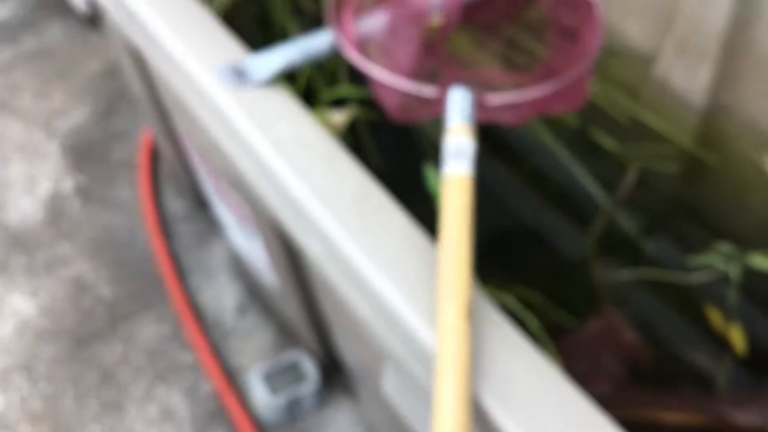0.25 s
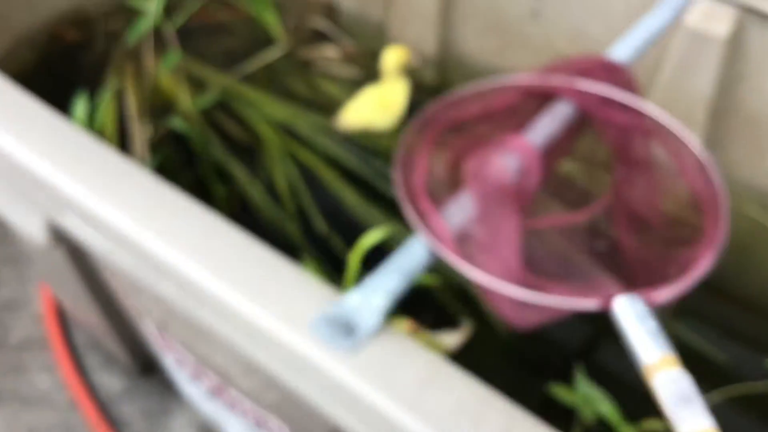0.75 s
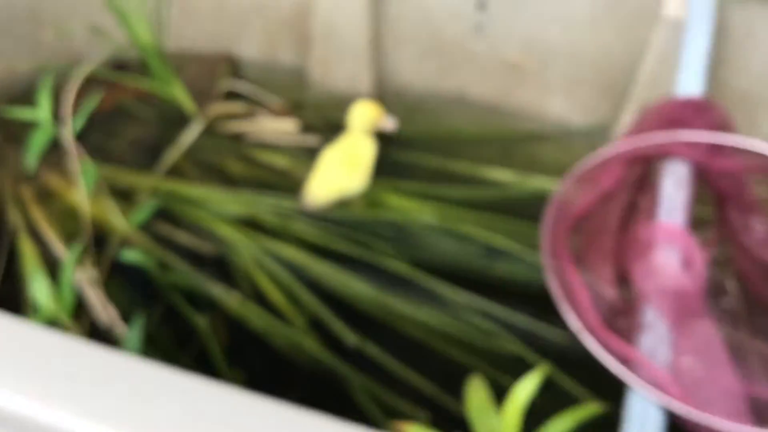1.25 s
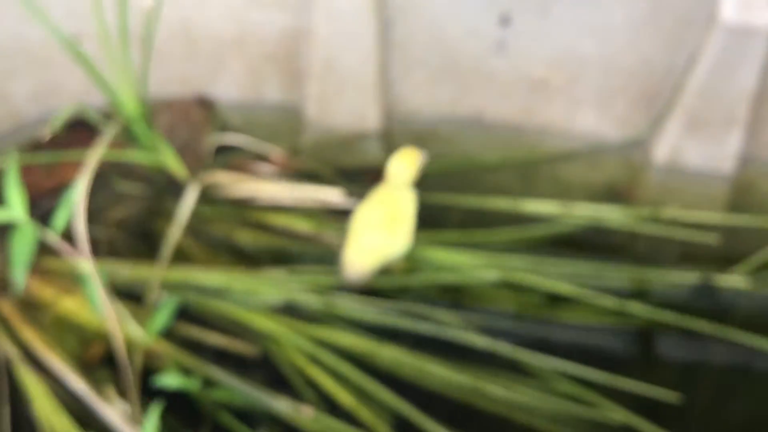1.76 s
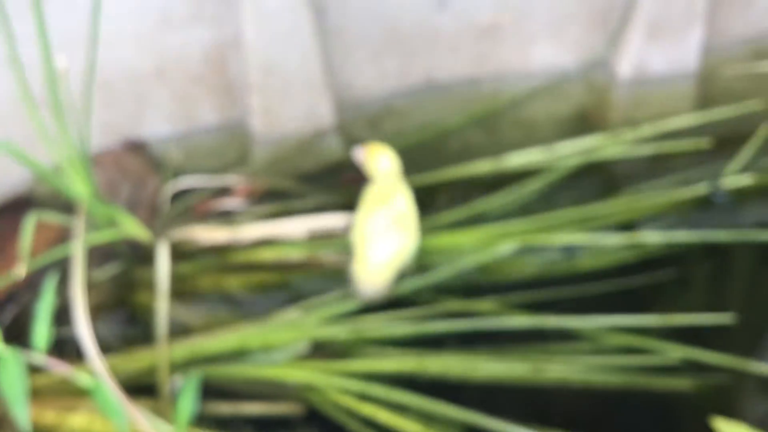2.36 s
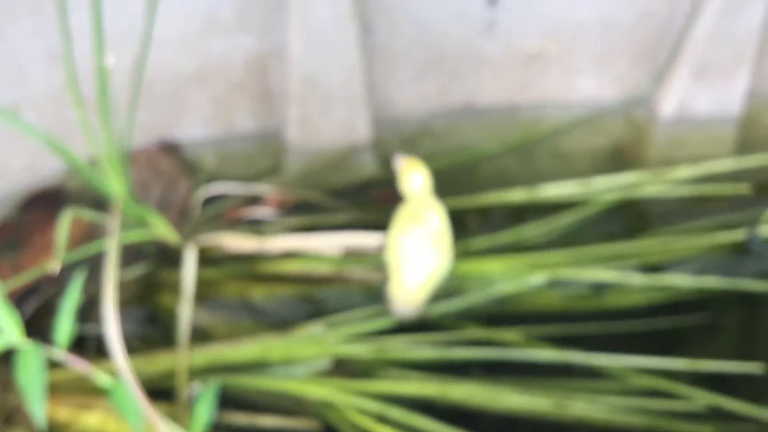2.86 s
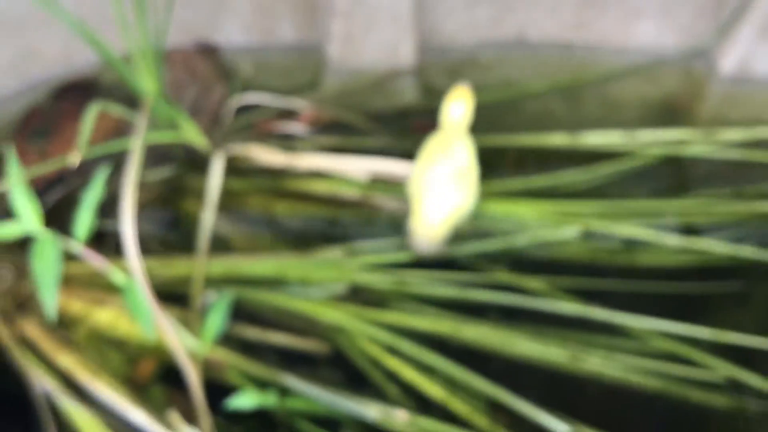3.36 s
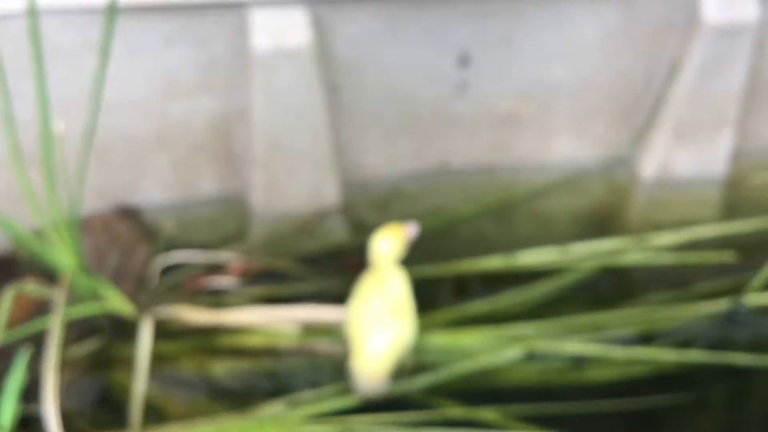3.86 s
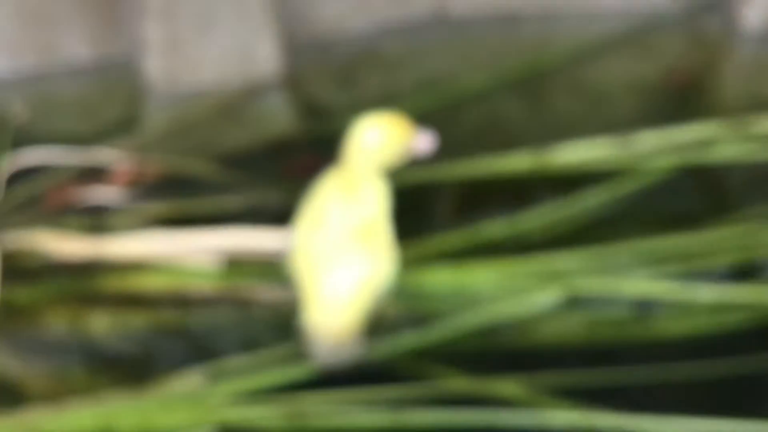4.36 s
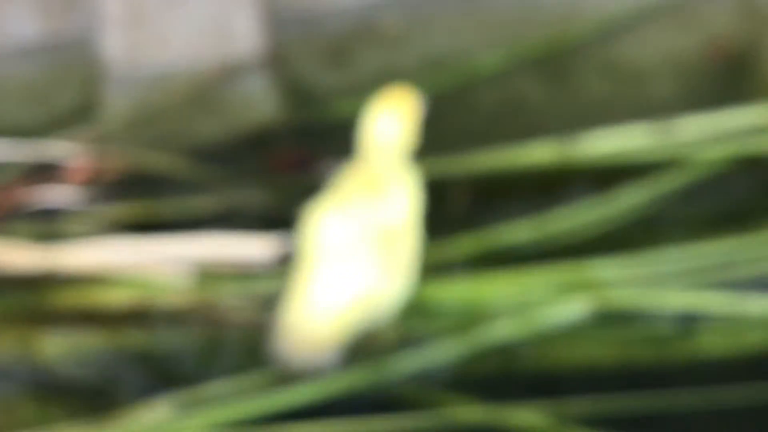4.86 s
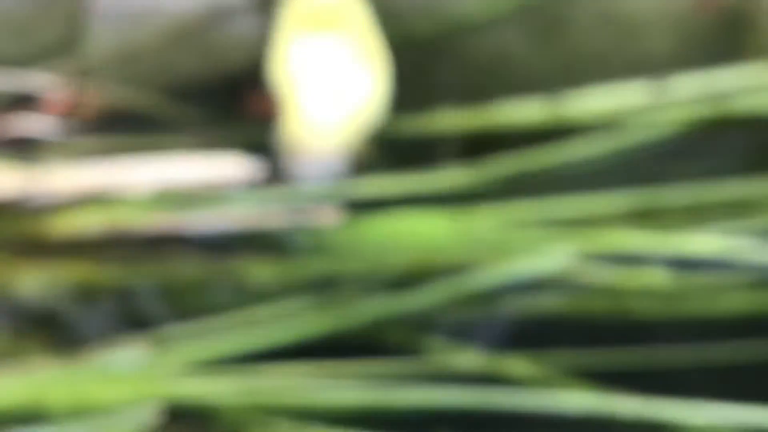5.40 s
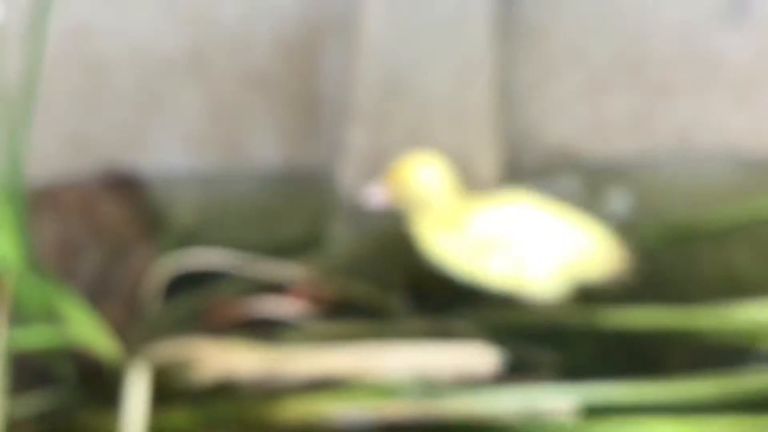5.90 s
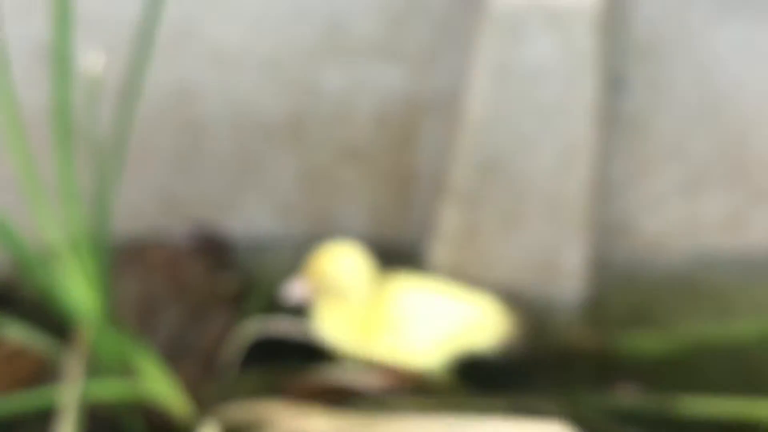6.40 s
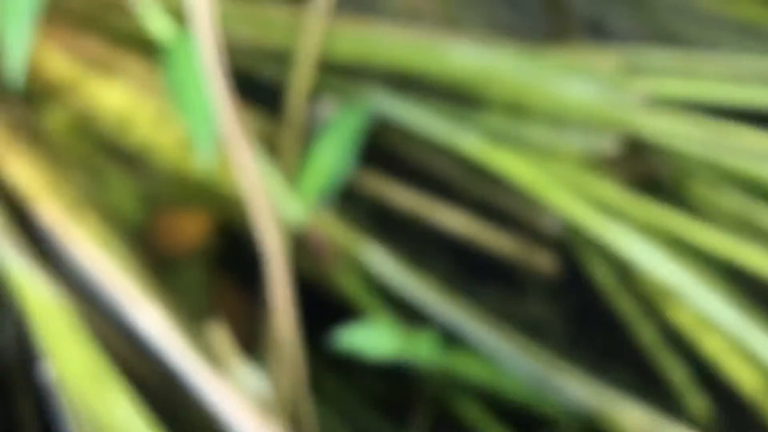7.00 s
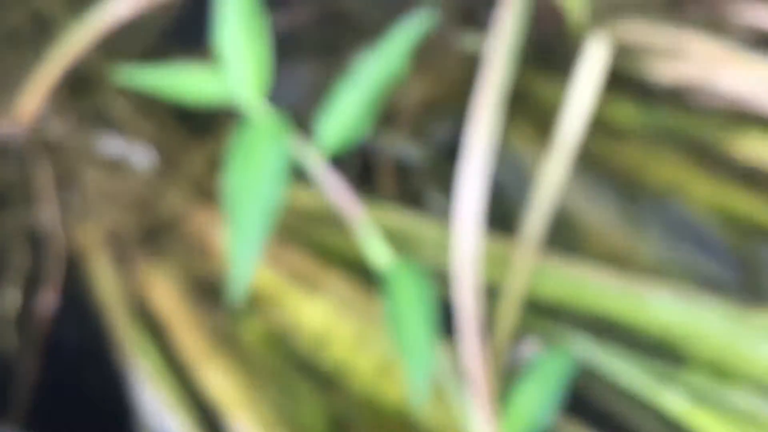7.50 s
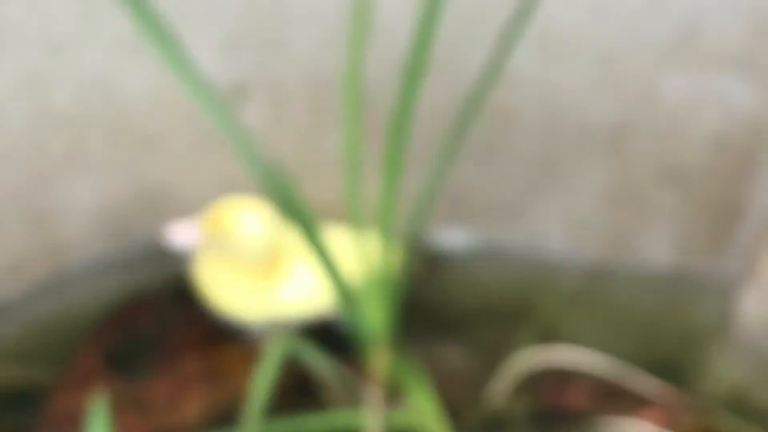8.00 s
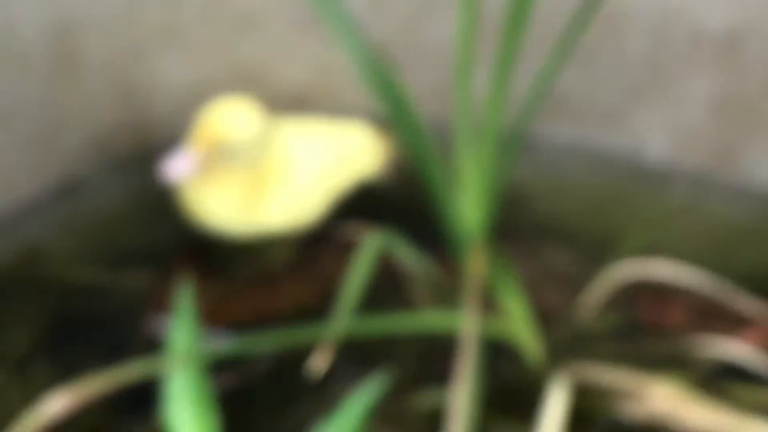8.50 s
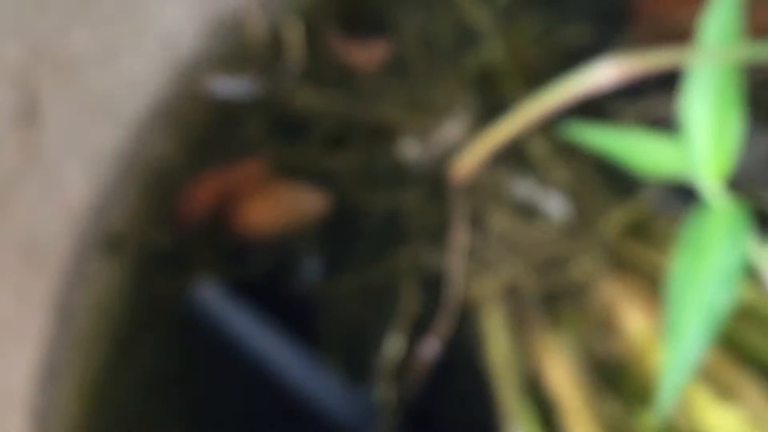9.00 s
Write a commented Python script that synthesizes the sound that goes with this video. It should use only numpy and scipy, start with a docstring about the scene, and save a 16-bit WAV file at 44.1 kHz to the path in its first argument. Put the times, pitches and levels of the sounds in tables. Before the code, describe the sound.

A quiet outdoor bed of distant rumble and hiss runs throughout. After a few faint taps and a light knock, a duckling starts peeping close by at about 1 second. The peeps are short, high, arched whistles with a slight rasp and a falling end, about four a second, with a tight echo off plastic tub walls. They grow louder and continue until just past 5 seconds. Between 1 and 3 seconds, soft rubs, scuffs and light knocks on thin plastic sound near the microphone, with a brief clatter at 2.3 seconds and a sharp tap near 2.9. In the pause, one faint drip falls at about 5.4 seconds, followed by a few light taps and a knock. From 7 to 7.7 seconds the duckling peeps three more times, each louder. Faint low handling bumps follow around 8 to 8.5 seconds, then only the background until about 9.

```python
"""Duckling in a pond tub

A stranded duckling peeps about four times a second, rests, then peeps three more times. Its syrinx
makes arched, fluttering whistles that drop at the end and bounce off the plastic walls. Close by are
rubs, scuffs, light knocks, a clatter and one drip, over a quiet outdoor bed of rumble and hiss."""
import sys
import numpy as np
from scipy import signal
from scipy.fft import rfft, irfft, next_fast_len
from scipy.io import wavfile
from scipy.ndimage import uniform_filter1d

SR = 44100
rng = np.random.default_rng(int(sys.argv[2]) if len(sys.argv) > 2 else 0)


def store_wav(level_fs):
    """Save 16-bit WAV to argv[1]."""
    pcm = np.round(np.clip(np.atleast_2d(level_fs), -1, 1) * 32767)
    wavfile.write(sys.argv[1], SR, pcm.T.astype(np.int16))


N = 407925

# one peep a row: start_s, length_s, base_pitch_hz, opening_offset_hz, climb_hz, drop_s, level_db,
# attack_s, fade_db, overtone_db, rasp_db, flutter_depth_hz
PEEP_CUES = [(0.8, 0.061, 3880, -810, -690, 0.016, -46.5, .012, -5, -81, -72, 60),
             (1.015, 0.08, 3823, -700, -360, 0.0053, -17, .04, 10, -55, -49.5, 20),
             (1.224, 0.096, 3920, -560, -3, 0.0059, -15, .044, 5, -48, -54.5, 30),
             (1.442, 0.096, 3996, -550, 286.5, 0.014, -14.5, .032, 3.5, -43.5, -49.5, 30),
             (1.661, .1, 3967, -590, 60, 0.0058, -15.5, .042, -0.5, -40.5, -47, 30),
             (1.892, 0.095, 4090, -350, 338, 0.015, -12.5, .032, 5, -45.5, -64.5, 10),
             (2.12, 0.097, 4133, -300, 321.5, 0.016, -12, .026, 6.5, -45.5, -60.5, 25),
             (2.359, .091, 4097, 287.5, 309, 0.016, -9.5, .031, 3.5, -40, -46.5, 20),
             (2.607, 0.077, 4060, 623, 652, .016, -10, .017, 2, -41, -43.5, 40),
             (2.844, .06, 4007, 123, -160, 0.0068, -18, .012, 1.5, -41, -53, 70),
             (3.048, .088, 4144, 61, 212, 0.017, -12.5, .026, 5, -39.5, -46.5, 60),
             (3.273, 0.093, 4067, 40.5, 266, .015, -10, .033, 6.5, -39, -44.5, 50),
             (3.525, 0.083, 4088, 116, 94, 0.017, -8.5, .035, 11, -39, -44, 90),
             (3.762, 0.092, 4036, 137.5, 254.5, 0.016, -9, .033, 10.5, -41, -47.5, 85),
             (4.01, .096, 4062, 59, 208.5, 0.019, -10.5, .03, 8.5, -39, -47.5, 60),
             (4.258, .093, 4072, -50.5, 240, 0.013, -7.5, .033, 11, -39, -50, 80),
             (4.502, .099, 4025, -100, 147, 0.0099, -8, .028, 15, -40.5, -50, 40),
             (4.76, 0.096, 4045, 37.5, 105, 0.015, -9, .038, 12.5, -39.5, -45.5, 15),
             (5.006, 0.096, 3964, 529, 322.5, 0.0087, -11, 0.057, 4, -38.5, -47.5, 10),
             (7.078, 0.044, 3707, 91, 330.5, 0.0078, -26.5, 0.031, 1.5, -51, -61, 10),
             (7.307, 0.072, 3860, 164, 347.5, 0.026, -19.5, .013, 5, -42.5, -44, 15),
             (7.578, 0.071, 4040, 45, 349, 0.031, -12.5, .026, 14.5, -42.5, -47.5, 10)]
# 2nd, 3rd and 4th harmonic against a peep's overtone level: gain_db
OVERTONE_MIX = [1, 1, -4.5]
# resonances of throat and open bill, colouring overtones and rasp: frequency_hz, gain_db
THROAT_EQ = [(300, -66.5), (1000, -27.5), (1900, -2), (2900, 4), (4200, 2), (5600, 6), (6400, -4.5),
             (7600, -0.5), (8400, -4), (9300, -6), (10500, -6), (11700, -1), (13600, -11.5), (15400, -8.5),
             (17000, -11.5)]
# first echoes off the water and tub walls: delay_s, gain_db
TUB_ECHOES = [(.0017, -4.5), (.0046, -9.5), (.0078, -12), (0.0121, -16.5), (0.0164, -16), (.024, -41)]
# strokes of rubbing and scuffing: start_s, length_s, attack_s, scrape_db, hiss_db
RUB_CUES = [(1.126, .075, .005, -43, -52), (1.21, .105, .03, -44, -55), (1.29, .06, 0.017, -56, -56.5),
            (1.35, .28, 0.025, -52, -62), (1.61, .04, .02, -56, -54), (1.78, .26, .05, -57, -60),
            (1.843, .11, .06, -46, -49), (2.407, 0.074, .03, -57, -62.5), (2.544, .31, .09, -55, -50.5),
            (2.74, .13, 0.044, -52, -50.5), (2.916, 0.076, .03, -57.5, -65)]
# dull scrape of a rub: frequency_hz, gain_db
SCRAPE_EQ = [(60, -12.5), (150, -4), (300, -1), (550, 1), (880, -6.5), (1200, -13), (2500, -25.5),
             (5000, -12.5), (9000, -54)]
# fine hiss of a rub: frequency_hz, gain_db
HISS_EQ = [(600, -29), (1800, -1.5), (4000, -2.5), (7000, -6.5), (9300, -3.5), (11500, -7.5), (14000, -6.5),
           (16000, -10.5)]
# knocks on thin plastic: start_s, level_db, decay_s, tick_db
KNOCK_CUES = [(.8922, -31.5, 0.018, -36), (1.461, -38, 0.0075, -70), (1.571, -22.5, 0.0042, -62),
              (1.766, -37, 0.011, -68), (2.547, -42, 0.041, -70), (2.959, -40.5, 0.0086, -63),
              (3.724, -46, 0.025, -75), (6.352, -27.5, 0.0047, -68.5)]
# hard things tapping and clattering against the tub: start_s, peak_db, decay_s, crack_db
TAP_CUES = [(0.277, -37.5, 0.0088, -64), (.392, -64, 0.0013, -33), (.818, -41, 0.048, -62),
            (2.3013, -23, 0.0052, -48), (2.3062, -27, 0.0086, -49), (2.3094, -22, 0.0099, -51),
            (2.3253, -40, 0.023, -35), (2.86, -33.5, 0.0033, -20.5), (5.741, -33, 0.0093, -63),
            (6.238, -42, 0.021, -66.5), (6.811, -40.5, .005, -60), (6.877, -41, 0.0034, -59),
            (7.053, -41.5, 0.041, -45)]
# resonances of the tapped things: frequency_hz, width_hz, gain_db
TAP_MODES = [(336, 56, 6.5), (470.7, 95, 9), (657.7, 280, 3), (938, 40, -18), (1459, 140, -8),
             (1935, 150, -9.5), (2200, 100, -19), (2750, 87.5, -23.5)]
# bright edge of a knock or tap: frequency_hz, gain_db
CRACK_EQ = [(400, -7.5), (1200, -8), (3000, 1), (5000, 5.5), (8000, -9), (12000, -11.5), (16000, -20.5)]
# a drip in the pond: start_s, pitch_hz, level_db, decay_s
DRIP_CUES = [(5.438, 1170, -45, .016)]
# reverb colour, fairly even with a dip around 2.6-4 kHz where the peeps sound: frequency_hz, gain_db
REVERB_EQ = [(300, -1.5), (1500, 1.5), (2600, -7), (3400, -3), (4100, -3.5), (6000, 0), (11000, 0.5),
             (16000, -2.5)]
# low handling bumps: start_s, length_s, level_db
BUMP_CUES = [(2.235, 0.046, -41.5), (3.051, 0.054, -49.5), (7.937, 0.093, -49.5), (8.416, 0.11, -48),
             (8.501, 0.085, -53.5)]
# soft thud of a bump: frequency_hz, gain_db
BUMP_EQ = [(25, -20), (55, 1), (100, 3), (200, -18), (600, -51.5)]
# distant outdoor rumble and hiss: frequency_hz, gain_db
AMBIENCE_EQ = [(20, -49.5), (30, -33.5), (42, -24.5), (60, -7), (110, -0.5), (160, -5.5), (230, -8.5),
               (570, -9), (1000, -17.5), (1400, -20), (2500, -22.5), (5500, -24.5), (13800, -34.5),
               (15800, -41)]
# level ride of that rumble and hiss: time_s, level_db
AMBIENCE_RIDE = [(0, -53.8), (4.3, -54), (5.1, -55.5), (5.7, -53.5), (9.25, -54.5)]

SETTLE_S, SAG_HZ, SAG_POWER = 0.011, 931, 3.0  # the opening settles; pitch sags as the push runs out
CREST_HZ, CREST_AT, CREST_WIDTH = 45.02, .36, 0.12  # lift at the height of the push (at, width: shares)
DROP_AT, DROP_HZ = .88, 700  # the closing drop starts at this share of the length
START_DB, FADE_FROM, FADE_TO, RELEASE_DB = 30, 0.5, .75, 19  # swell, fade span (shares), closing dip
USUAL_DB = -12  # reference level of a peep
FLUTTER_HZ, FLUTTER_HZ_PER_DB, SLOWEST_FLUTTER_HZ = 145, 15, 130  # harder peeps flutter faster
TREMOLO_PER_HZ = 0.0023  # a throat resonance turns pitch flutter into level flutter
DRIFT_HZ, CLEAR_JITTER_HZ, RASP_JITTER_HZ, WOBBLE_RAD = 16, 26, 80, .4  # unsteadiness of the syrinx
HALF_DB, HALF_GROWTH, HALF_PATCHY_DB = -60.5, 0.16, 6  # half-harmonics barely follow effort, and flicker
FUZZ_OFFSET_HZ, FUZZ_WIDTH_HZ, FUZZ_DB = 432, 420, 10  # the rasp peaks just above the whistle
RASP_START_DB = 7.5  # the rasp swells in from this far below


def duckling(trim_db=-0.7):
    """The lead voice: every peep, with its slap off the tub."""
    out = np.zeros(N)
    for start, *shape in PEEP_CUES:
        add(out, start, tub(peep(*shape)))
    return amp(trim_db) * out


def peep(length, pitch_hz, opening_hz, climb_hz, drop_s, level_db, attack, fade_db, overtone_db, rasp_db,
         flutter_hz, flick_from=0.45, flick_s=0.0028, shimmer_db=3, hoarse_db=18, dulling_db=4):
    """The syrinx flicks up into a raspy start, clears to a fluttering whistle, falls as the push ends."""
    t = np.arange(SR // 8) / SR
    progress = t / length
    effort_db = level_db - USUAL_DB
    drop = np.clip((t - DROP_AT * length) / drop_s, 0, 1)
    gate = ramp(t, -0.00073, 0.0061) * (1 - ramp(drop, 0.81, 0.83))
    hoarse = np.clip(amp(rasp_db - level_db + hoarse_db), .03, .6)  # a weak peep never quite clears
    roughness = ramp(progress, 0, 0.097) * (1 - (1 - hoarse) * ramp(progress, 0.29, 0.34)) * (1 - drop)
    pressure = ramp(progress, .14, 0.33)  # overtones need full pressure

    held = np.minimum(progress, 1)
    arch = pitch_hz + opening_hz * np.exp(-(t / SETTLE_S) ** 2)
    arch += climb_hz * (held - .5) - SAG_HZ * held ** SAG_POWER - DROP_HZ * drop
    arch += CREST_HZ * np.exp(-((progress - CREST_AT) / CREST_WIDTH) ** 2)
    arch *= flick_from + (1 - flick_from) * ramp(t, 0, flick_s)
    # the membranes shiver at the top of the call and jitter while they start up
    flutter_rate = max(FLUTTER_HZ + FLUTTER_HZ_PER_DB * effort_db, SLOWEST_FLUTTER_HZ)
    shiver = np.sin(2 * np.pi * (flutter_rate * t + rng.random() + 0.147 * wander(53, t)))
    shiver *= flutter_hz * (0.073 + ramp(progress, 0.2, .3) - 0.8 * ramp(progress, .35, 1.0))
    jitter = DRIFT_HZ * wander(100, t) + CLEAR_JITTER_HZ * wander(550, t)
    jitter += RASP_JITTER_HZ * roughness * wander(1500, t)
    hz = uniform_filter1d(arch, size=150) + shiver + jitter
    phase = 2 * np.pi * np.cumsum(hz) / SR

    onset = np.maximum(1 - t / attack, 0) ** 2
    fade = ramp(progress, FADE_FROM, FADE_TO)
    envelope = amp(level_db - START_DB * onset - fade_db * fade - RELEASE_DB * drop)
    whistle = envelope * (1 + TREMOLO_PER_HZ * shiver) * np.sin(phase)

    def partial(multiple):
        """A shimmering overtone glides through the throat resonances; high ones die first in the drop."""
        db = shimmer_db * wander(220, t) - dulling_db * multiple * drop - RELEASE_DB * drop
        tone = np.sin(multiple * phase + WOBBLE_RAD * wander(540, t))
        return gain_at(THROAT_EQ, multiple * hz) * amp(db) * tone

    overtones = sum(amp(overtone_db + db) * partial(k) for k, db in enumerate(OVERTONE_MIX, 2))
    # alternate cycles differ a little, adding faint tones between the harmonics, least in mid-peep
    halves = sum(amp(db + HALF_PATCHY_DB * wander(110, t)) * partial(k + .5)
                 for k, db in enumerate([-1, 0.9, 0.87, -2]))
    halves *= amp(HALF_DB + HALF_GROWTH * effort_db)
    halves *= 1.5 - ramp(progress, .2, .42) + ramp(progress, .55, 0.88)

    fuzz = wander(FUZZ_WIDTH_HZ, t) + 1j * wander(FUZZ_WIDTH_HZ, t)
    fuzz *= np.exp(1j * (phase + 2 * np.pi * FUZZ_OFFSET_HZ * t))  # the band tracks the whistle
    rasp = 1.9 * noise(THROAT_EQ, len(t)) + amp(FUZZ_DB) * fuzz.real
    rasp *= amp(rasp_db - RASP_START_DB * onset) * roughness
    return gate * (np.sqrt(2) * (whistle + pressure * (overtones + halves)) + rasp)


def tub(x, spread=0.11):
    """Wall echoes beat against the gliding whistle; their paths change as the bird moves."""
    out = np.concatenate([x, np.zeros(SR // 20)])
    for (delay, db), shift in zip(TUB_ECHOES, rng.uniform(-1, 1, len(TUB_ECHOES))):
        add(out, delay * (1 + spread * shift), amp(db) * x)
    return out * np.linalg.norm(x) / np.linalg.norm(out)


def rubbing(grain_db=3.0, release_s=.04):
    """Uneven friction: a dull scrape and a fine hiss catch and slip together."""
    out = np.zeros(N)
    for start, length, attack, scrape_db, hiss_db in RUB_CUES:
        t = np.arange(int((length + release_s) * SR)) / SR
        stroke = ramp(t, 0, attack) * (1 - ramp(t, length, length + release_s))
        grip = amp(grain_db * wander(250, t))
        scrape = amp(scrape_db) * noise(SCRAPE_EQ, SR // 2)[:len(t)]
        hiss = amp(hiss_db) * noise(HISS_EQ, SR // 2)[:len(t)]
        add(out, start, stroke * grip * (scrape + hiss))
    return out


def knocks(attack_s=0.0008, tick_decay_s=0.00051, sweep_cycles=1.8, arrival_s=.0013):
    """Bending waves in thin plastic carry treble fastest, so each knock sweeps down in pitch."""
    out, t = np.zeros(N), np.arange(SR // 12) / SR
    chirp = np.sin(2 * np.pi * sweep_cycles * np.log(1 + t / arrival_s))  # pitch = cycles / travel time
    chirp *= 1 - np.exp(-(t / attack_s) ** 2)
    for start, db, decay, tick_db in KNOCK_CUES:
        tick = amp(tick_db) * noise(CRACK_EQ, len(t)) * np.exp(-t / tick_decay_s)
        add(out, start, amp(db) * chirp * np.exp(-t / decay) + tick)
    return out


def taps(attack_s=.0016, crack_decay_share=.6):
    """A brief rattle of contacts rings a hard object, with a sharp crack on top."""
    out, t = np.zeros(N), np.arange(SR // 6) / SR
    low_cut = signal.butter(4, 270, "high", fs=SR, output="sos")  # small things radiate little bass
    for start, db, decay, crack_db in TAP_CUES:
        rattle = rng.standard_normal(len(t)) * np.exp(-t / decay) * np.minimum(t / attack_s, 1)
        body = sum(amp(mode_db) * ring(rattle, hz, width) for hz, width, mode_db in TAP_MODES)
        body = signal.sosfilt(low_cut, body)
        crack = noise(CRACK_EQ, len(t)) * np.exp(-t / (crack_decay_share * decay))
        add(out, start, amp(db) * body / abs(body).max() + amp(crack_db) * crack / abs(crack).max())
    return out


def drip(rise=1.3, attack_s=0.0015):
    """A small bubble rings and bends up a little in pitch."""
    out, t = np.zeros(N), np.arange(SR // 10) / SR
    for start, hz, db, decay in DRIP_CUES:
        bubble = np.sin(2 * np.pi * hz * t * (1 + rise * t))
        add(out, start, amp(db) * bubble * np.exp(-t / decay) * np.minimum(t / attack_s, 1))
    return out


def yard(x, t60_s=0.2, treble_t60_s=0.053, wet_db=-22, crossover_hz=6000, build_s=.008):
    """Adds a short, diffuse reverb tail whose top end dies first."""
    t = np.arange(SR // 2) / SR
    wash = noise(REVERB_EQ, len(t))
    low = signal.sosfiltfilt(signal.butter(2, crossover_hz, fs=SR, output="sos"), wash)
    tail = low * amp(-60 * t / t60_s) + (wash - low) * amp(-60 * t / treble_t60_s)
    tail *= np.minimum(t / build_s, 1)
    return x + amp(wet_db) * signal.oaconvolve(x, tail / np.linalg.norm(tail))[:N]


def background(swell_db=1.5):
    """A wavering bed of distant rumble and hiss, with soft low handling bumps."""
    t = np.arange(N) / SR
    level_db = np.interp(t, *np.transpose(AMBIENCE_RIDE)) + swell_db * wander(15, t)
    out = amp(level_db) * noise(AMBIENCE_EQ, N)
    for start, length, db in BUMP_CUES:
        window = np.hanning(int(length * SR))
        add(out, start, amp(db) * window * noise(BUMP_EQ, SR // 4)[:len(window)])
    return out


def amp(db):
    """Decibels to gain."""
    return 10 ** (np.asarray(db) / 20)


def add(mix, start_s, sound):
    """Lays a sound into the mix at start_s."""
    part = mix[round(start_s * SR):][:len(sound)]
    part += sound[:len(part)]


def gain_at(eq, hz):
    """Reads an EQ curve (frequency_hz, gain_db) as a gain."""
    frequencies, db = np.transpose(eq)
    return amp(np.interp(np.log(hz + 1), np.log(frequencies), db))


def noise(eq, size):
    """Noise of rms 1, coloured by an EQ curve."""
    full = next_fast_len(size)
    spectrum = rfft(rng.standard_normal(full)) * gain_at(eq, np.fft.rfftfreq(full, 1 / SR))
    x = irfft(spectrum, full)[:size]
    return x / np.sqrt(np.mean(x ** 2) + 1e-20)


def wander(per_s, t):
    """A random modulator of about unit size, with per_s new values a second."""
    return np.interp(t * per_s, np.arange(8192), rng.standard_normal(8192))


def ramp(x, start, end):
    """A smooth fade from 0 at start to 1 at end."""
    return np.sin(np.pi / 2 * np.clip((x - start) / (end - start), 0, 1)) ** 2


def ring(x, hz, width_hz):
    """One resonance with gain 1 at its peak."""
    radius = np.exp(-np.pi * width_hz / SR)
    return 2 * signal.lfilter([1 - radius], [1, -radius * np.exp(2j * np.pi * hz / SR)], x).real


def scene():
    """Bird, clatter and drip sound in the yard; the rubbing and knocks are close and dry."""
    return (yard(duckling() + taps() + drip()) + rubbing() + knocks() + background())[None]


def record(dry, threshold_db=-22, squeeze=0.15, recovery_db_per_s=16, low_cut_hz=45, high_cut_hz=15850):
    """Gain control ducks the mix a little at each loud peep; then a low cut and a high cut."""
    power_db = 10 * np.log10(abs(uniform_filter1d(dry[0] ** 2, size=400)) + 1e-12)
    cut_db = squeeze * np.maximum(power_db - threshold_db, 0)
    recovery_db = np.arange(N) * recovery_db_per_s / SR
    held_db = np.maximum.accumulate(cut_db + recovery_db) - recovery_db  # fast grab, steady release
    ducked = dry / amp(uniform_filter1d(held_db, size=200))
    low_cut = signal.butter(4, low_cut_hz, "high", fs=SR, output="sos")
    high_cut = signal.firwin(511, high_cut_hz, window=("kaiser", 9), fs=SR)
    return signal.oaconvolve(signal.sosfilt(low_cut, ducked), high_cut[None], "same")


dry = scene()
out = record(dry)
store_wav(out)
```